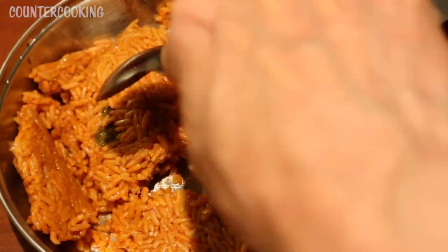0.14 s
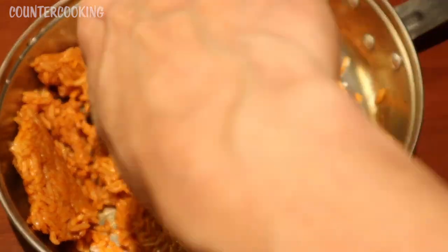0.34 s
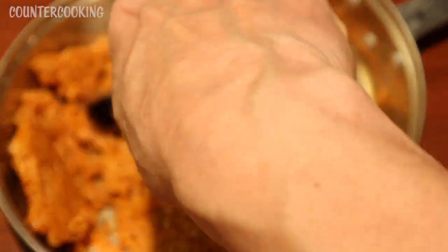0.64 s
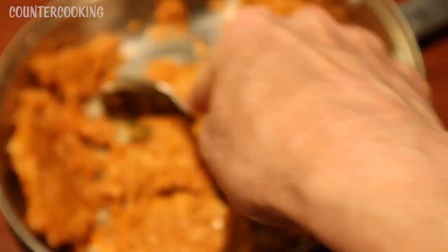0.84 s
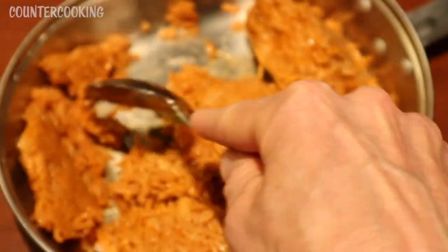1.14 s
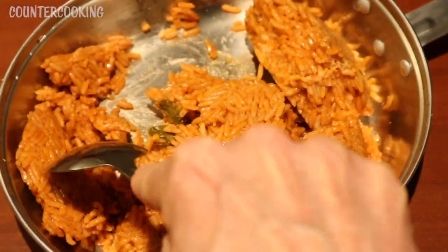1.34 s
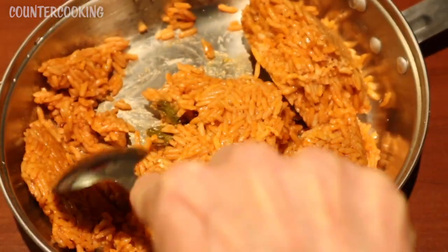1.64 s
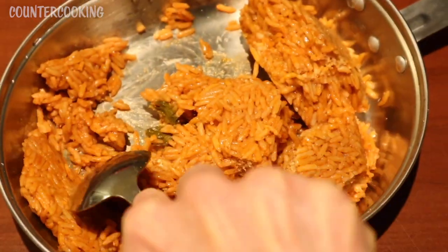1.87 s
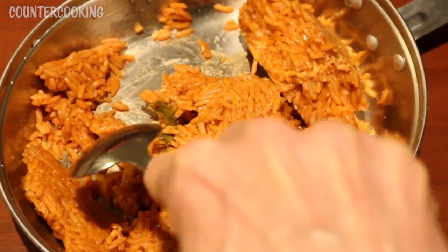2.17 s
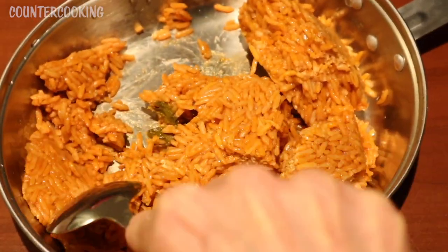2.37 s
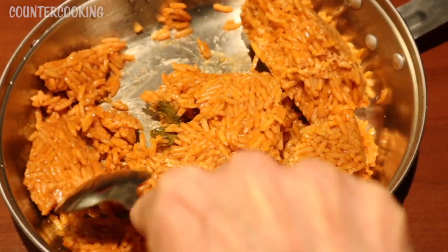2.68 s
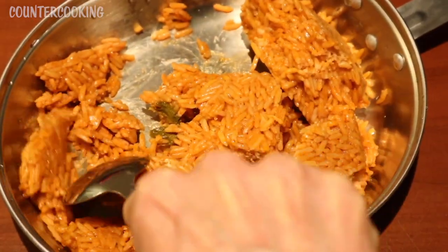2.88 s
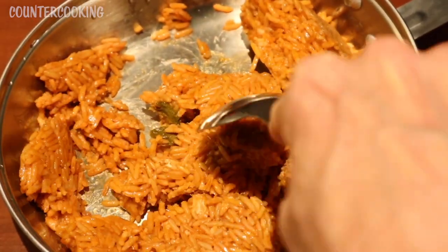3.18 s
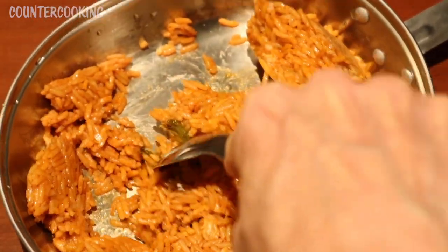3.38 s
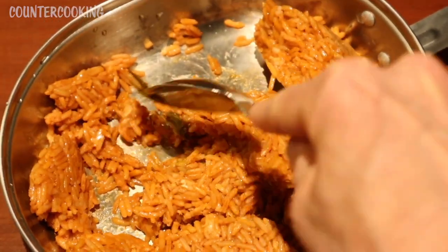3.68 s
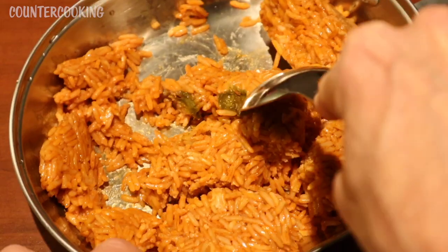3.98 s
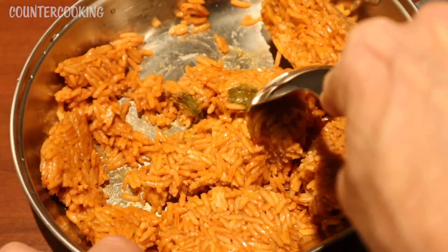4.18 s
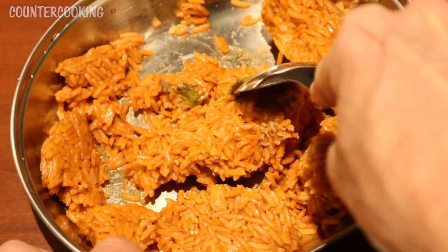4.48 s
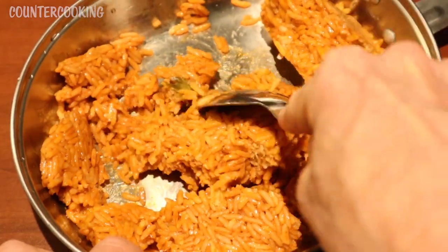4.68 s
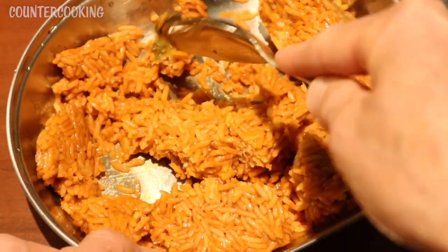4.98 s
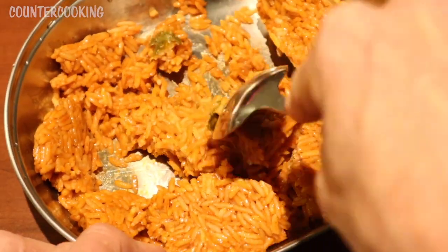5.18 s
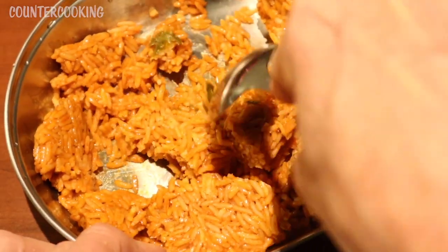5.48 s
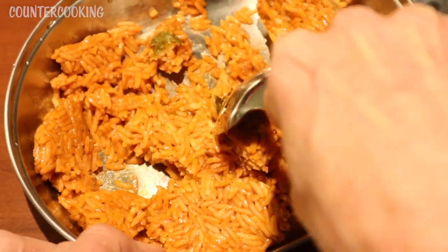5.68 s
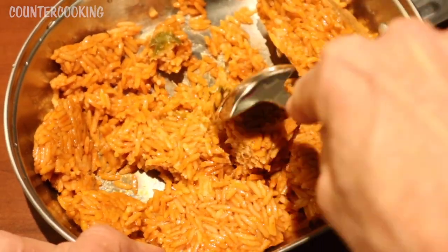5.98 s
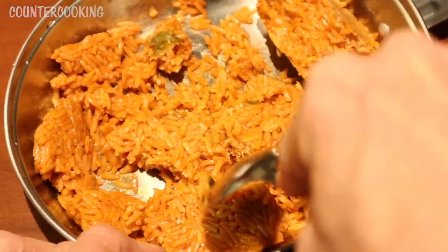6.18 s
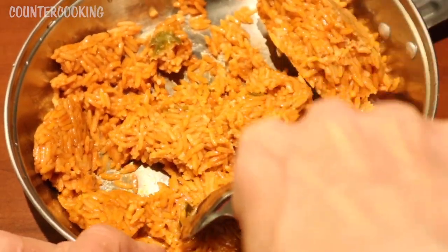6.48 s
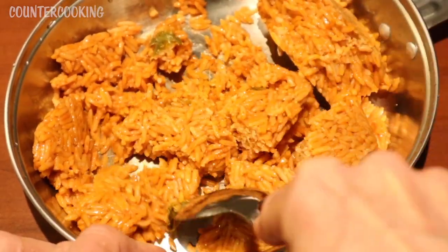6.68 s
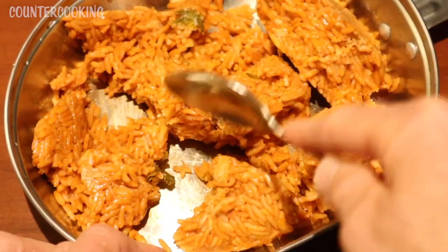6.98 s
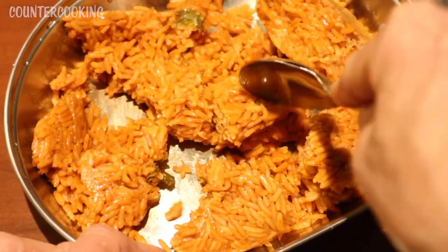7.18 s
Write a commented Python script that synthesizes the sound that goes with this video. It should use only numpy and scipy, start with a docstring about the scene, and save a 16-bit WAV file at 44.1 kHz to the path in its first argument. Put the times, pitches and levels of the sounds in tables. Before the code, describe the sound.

A spoon works through moist rice in a stainless pot on a wooden table, heard close with short room reflections. Irregular hard clacks, mostly deadened by the rice, alternate with gritty scrapes and fine wet crackling. Once the pot tips and its wall rings briefly. Light quick taps come later, then a heavy hollow knock with a dull table bump. A low rumble and wavering hum continue underneath.

```python
"""Breaking up rice in a steel pot

A steel spoon breaks up cooked rice in a stainless pot on a wooden table, in a small humming kitchen.
Knocks are noise bursts and decaying modes of spoon and pot; once the pot tips and its wall rings freely.
Between them, scrapes are random clicks through steel resonances, and the sticky rice crackles and snaps.
Dull table bumps are shaped noise; the room adds a short reverberation, a rumble and a wavering hum."""
import sys
import numpy as np
from scipy import signal
from scipy.fft import rfft, irfft, next_fast_len
from scipy.io import wavfile

SR = 44100
rng = np.random.default_rng(int(sys.argv[2]) if len(sys.argv) > 2 else 0)


def digitize_waveform(pressure):
    """Quantize a signal to 16-bit integers and store it at the path in sys.argv[1].

    Rows of a 2-D input are taken as channels; values are limited to [-1, 1].
    """
    field = np.atleast_2d(pressure).T
    bounded = np.clip(field, -1, 1)
    quanta = np.round(bounded * 32767).astype(np.int16)
    wavfile.write(sys.argv[1], SR, quanta)


N = 323401
TIME = np.arange(N) / SR
RING_TIME = TIME[:SR]  # one second, room for any single sound

# Appliance hum. Each row: frequency in Hz, level in dB rms.
HUM_TONES = [(120, -47.5), (151, -51.5), (240, -61), (360.5, -57.5)]
# Colour of the kitchen air. Each row: frequency in Hz, relative density in dB per Hz.
AIR_COLOUR = [(12, -36.5), (22, -7.5), (45, 1.5), (103, 0), (135, -1.5), (286, -16.5), (367, -15),
              (525, -19.5), (914, -20.5), (994, -23.5), (6010, -40), (7930, -46.5), (10200, -48),
              (11700, -53), (13100, -87), (15000, -83.5)]
# Side against mid for the diffuse air. Each row: frequency in Hz, gain in dB.
AIR_WIDTH = [(30, -25.5), (110, -25), (200, -5), (380, 0.5), (1200, 4), (8000, 6.5)]
# Side against mid for the nearby pot. Each row: frequency in Hz, gain in dB.
POT_WIDTH = [(100, -30.5), (400, -26), (1000, -16.5), (2200, -14.5), (4500, -6.5), (9000, -1.5)]
# Dull bumps of pot and hand on the table. Each row: start in seconds, level in dB rms before the decay.
TABLE_BUMPS = [(.702, -27), (3.459, -27), (6.65, -24.5), (7.243, -29.5)]
# Colour of a bump. Each row: frequency in Hz, relative density in dB per Hz.
BUMP_COLOUR = [(25, -1), (55, -1), (160, -6.5), (300, -18), (1000, -43), (5000, -80)]
# Pushes of the spoon through the rice.
# Each row: start in seconds, length in seconds, relative crackle level at the end in dB.
RICE_PUSHES = [(0.213, 0.54, -50.5), (0.845, 0.17, -51.5), (1.363, 0.11, -53.5), (1.9, .09, -56.5),
               (2.37, .17, -53), (3.78, 0.16, -52), (4.266, 0.63, -46), (4.897, 0.14, -50),
               (5.56, 0.3, -54.5), (6.48, 0.37, -44.5)]
# Wet snaps of rice pulling apart. Each row: start in seconds, relative level in dB.
RICE_SNAPS = [(0.606, -37), (0.804, -34), (1.109, -33.5), (1.439, -33.5), (1.793, -32.5), (4.292, -35),
              (4.655, -27), (5.289, -32), (5.64, -37), (5.976, -30)]
# Colour of crackling rice. Each row: frequency in Hz, gain in dB.
RICE_COLOUR = [(800, -10), (2500, 3.5), (6000, -6), (10000, -3.5), (12000, -8.5), (13500, -14),
               (15500, -38.5)]
# Spoon strokes on the steel. Each row: strongest moment in seconds, length in seconds (twice the sum
# of the rising and falling sigma), relative level in dB, rice under the spoon from 0 to 1.
SPOON_STROKES = [(0.682, 0.052, -50, 0.6), (0.987, 0.089, -55.5, 0.78), (1.375, 0.042, -52, 0.5),
                 (2.132, .024, -49.5, 0.44), (2.567, 0.12, -32.5, 0.52), (2.686, 0.073, -34, 0.2),
                 (3.44, 0.15, -44.5, 0.93), (3.61, 0.094, -56.5, 0.99), (3.833, 0.2, -49.5, 0.78),
                 (4.866, 0.048, -40, 0.33), (5.845, 0.075, -47.5, 0.55), (6.302, .04, -53.5, .4),
                 (6.499, .07, -47, 0.37), (6.808, 0.22, -43, 0.44), (6.899, .11, -34.5, 0),
                 (7.273, 0.072, -57, 0.96)]
# Colour of the broad rasp. Each row: frequency in Hz, gain in dB.
RASP_COLOUR = [(200, -8), (500, 5), (1100, 8), (2200, 19), (4500, -10), (8000, -63.5), (15000, -47.5)]
# Colour of the scrape's hiss. Each row: frequency in Hz, gain in dB.
HISS_COLOUR = [(1500, -19.5), (4000, -12.5), (6200, -2), (7500, -4), (9800, 6), (11500, -2), (13300, -11.5),
               (14500, -33.5), (16000, -39.5)]
# Resonances of spoon and pot in contact. Each row: frequency in Hz, width in Hz, gain in dB.
RUB_RESONANCES = [(1652, 72, 14), (2100, 210, 14.5), (2545, 220, 14), (2856, 190, 17.5), (3350, 80, 4.5),
                  (3980, 140, -26), (4120, 100, -17.5), (5930, 490, -6)]
# Light taps of the spoon. Each row: start in seconds, relative level in dB, spoon pitch in Hz.
LIGHT_TAPS = [(0.1078, -43.5, 2270), (1.1061, -42, 2520), (2.1263, -39.5, 2590), (3.7365, -36, 1490),
              (4.861, -29.5, 2280), (4.928, -27.5, 2000), (4.993, -31, 2010), (5.034, -33, 1310),
              (5.9737, -39, 2280), (6.2774, -42.5, 1780), (6.4864, -36, 2450), (7.02, -45, 2060)]
# The bowl of the spoon, pressed on steel.
# Each row: multiple of its pitch, level in dB, t60 in seconds before any further damping.
SPOON_MODES = [(0.581, -39, .012), (.81, -5, 0.017), (1.001, 5, 0.02), (1.14, -2.5, 0.026),
               (1.62, -11, 0.031)]
# Free wall of the tipped pot.
# Each row: frequency in Hz, level in dB, t60 in seconds before any further damping.
WALL_MODES = [(510.4, 3.5, 0.25), (1164, 0, .25), (1305, 4, 0.41), (1650, -7.5, 0.28), (1717, 8.5, 0.17),
              (1907, -1, 0.28), (2184, -13, 0.6), (2374, -9, 0.29), (2542, -16.5, .16), (3020, -7, 0.31),
              (3276, 3.5, 0.14), (3704, -5.5, 0.2), (4050, -17, .75), (4720, 3, 0.14), (5100, -13, .18),
              (4870, -15, .4), (5200, -13, .14), (6130, -8, 0.22), (9390, 1.5, 0.083)]
# Pot loaded with rice. Each row: frequency in Hz, level in dB, t60 in seconds.
POT_MODES = [(231.5, -16, 0.27), (294.1, -10, 0.24), (350.6, -4, .14), (379, 4, 0.1), (423, -2, 0.16),
             (489.7, -5.5, 0.19), (611.8, -6.5, 0.22), (666, -6.5, 0.16), (761, -6.5, 0.11),
             (824, -12, 0.18), (926.5, -0.5, 0.085), (1200, -6.5, 0.064), (1368, -8, 0.045),
             (1636, -1.5, 0.081), (2080, 7, 0.03), (2200, -11.5, 0.048), (2610, 0, 0.07),
             (3233, 1.5, 0.045)]
# Knocks on the pot. Each row: start in seconds, relative level in dB, brightness in dB per octave,
# hollowness from -1 to 1, spoon pitch in Hz, relative spoon level in dB, floor pitch in Hz.
POT_KNOCKS = [(0.7015, -10.5, -2.5, -0.28, 3450, 8, 962), (2.0101, -16.5, -3.5, -0.77, 2100, 4.5, 426),
              (2.4923, -11, 2.5, -0.081, 2700, -3, 500), (2.5897, -4.5, -3, 0.13, 1890, 5, 406),
              (2.9284, -9.5, 0.58, -0.085, 2140, 3.5, 426), (3.4584, -4.5, -1.4, .2, 2760, 4.5, 616),
              (4.721, -11, -.6, 0.27, 2000, -2, 613), (5.8487, -9.5, -4, -0.11, 2360, 14.5, 1050),
              (6.6496, -3.5, -5, 0.89, 2120, -2, 610)]
# Colour of a knock's contact noise. Each row: frequency in Hz, gain in dB.
CONTACT_COLOUR = [(150, -21), (350, 0.5), (900, 1), (1300, 1.5), (2200, 4.5), (3300, 1.5), (4500, -1),
                  (7500, -7), (10000, -4), (11800, -12), (13500, -21), (16000, -87)]
# Tone of a hollow knock, which booms and ticks more and clacks less.
# Each row: frequency in Hz, gain in dB at hollowness 1.
HOLLOW_TONE = [(380, 1), (750, 9), (2100, -1.5), (4800, -3), (10000, 10)]

AIR_DB = -40  # rms
TIP_S, TIP_DB = 2.4922, -21
DAMPING_AFTER_S = 0.12  # the low wall modes begin to be damped this long after the pot tips
SWELL_SHARE = 0.62  # part of a stroke spent pressing harder; the rest lets go
# what a stroke adds to its rasp: dB on bare steel, dB on a bed of rice
STROKE_HISS_DB, STROKE_FLOOR_DB = (-19, 1.5), (-15.5, 9.5)
# the crackle grows as the clump is squeezed and dies when it gives way
PUSH_ATTACK_S, PUSH_BUILD_DB_PER_S, PUSH_RELEASE_DB_PER_S = .03, 22, 110
TOP_HZ = 15800  # upper limit of the finished sound


def undb(db):
    """Decibels to gain."""
    return 10 ** (np.asarray(db) / 20)


def unit(x):
    """Scale to rms 1."""
    return x / np.sqrt(np.mean(x ** 2))


def colour(x, points):
    """Causal minimum-phase filter through (Hz, dB) points."""
    size = 2 * next_fast_len(x.shape[-1] // 2 + 1024)
    point_hz, point_db = np.transpose(points)
    bin_hz = np.arange(size // 2 + 1) * SR / size
    gain_db = np.interp(np.log(bin_hz + 1), np.log(point_hz), point_db)
    # folding the cepstrum forward in time keeps the filter from sounding before its input
    cepstrum = irfft(np.log(undb(gain_db)))[:size // 2]
    cepstrum[1:] *= 2
    response = np.exp(rfft(cepstrum, size))
    return irfft(rfft(x, size) * response)[..., :x.shape[-1]]


def stereo(mid, side, width=POT_WIDTH):
    """Left and right: alike in the bass, apart in the treble."""
    return mid + np.array([[1], [-1]]) * colour(side, width)


def noise(size):
    """Diffuse noise at the two microphones."""
    return stereo(*rng.standard_normal((2, size)))


def fade(t60):
    """Exponential decay, 60 dB down after t60 seconds."""
    return np.exp(-np.log(1000) * RING_TIME / t60)


def wander(rate):
    """A random course at rms 1, with rate new targets a second."""
    knots = rng.standard_normal(N // 50)
    return unit(np.interp(TIME * rate, np.arange(len(knots)), knots))


def add(track, s, sound):
    """Mix a sound into a track at time s."""
    start = int(s * SR)
    track[:, start:start + sound.shape[-1]] += sound[..., :N - start]


def grains(rate, spread_db):
    """Tiny clicks at random times, most weak and a few strong, at rms 1."""
    happens = rng.random(N) < rate / SR
    strength = undb(spread_db * np.minimum(rng.exponential(size=N), 4))
    clicks = happens * strength * rng.standard_normal((2, N))
    return unit(stereo(*clicks))


def resonate(x, resonances):
    """Sum of (Hz, width Hz, dB) resonances driven by x, at rms 1."""
    total = 0
    for hz, width, db in resonances:
        b, a = signal.iirpeak(hz, hz / width, fs=SR)
        total = total + undb(db) * signal.lfilter(b, a, x)
    return unit(total)


def ring(modes, detune, scatter_db):
    """Struck modes as decaying sines; each mode's pitch and strength vary a little at random."""
    mid, side = np.zeros((2, SR))
    for k, (hz, db, t60) in enumerate(modes):
        shift, strength, lean = rng.standard_normal(3)
        t = RING_TIME[RING_TIME < 2 * t60]
        level = (-1) ** k * undb(db + scatter_db * strength)  # neighbouring modes start in opposite phase
        decay = np.exp(-np.log(1000) * t / t60)
        wave = level * decay * np.sin(2 * np.pi * hz * (1 + detune * shift) * t)
        mid[:len(t)] += wave
        side[:len(t)] += np.tanh(lean) * wave
    return stereo(mid, side)


def background(waver=.2):
    """Low rumble of the room, as coloured noise, and a hum of sines wavering in level and phase."""
    air = stereo(*rng.standard_normal((2, N)), AIR_WIDTH)
    out = undb(AIR_DB) * unit(colour(air, AIR_COLOUR))
    for hz, db in HUM_TONES:
        level = undb(db) * np.sqrt(2) * (1 + waver * wander(6.7))
        phase = 2 * np.pi * hz * TIME + waver * wander(13.0)
        out = out + level * np.sin(phase)
    return out


def kitchen(x, wet_db=-7, low_t60=0.3, high_t60=0.074, treble=0.37, gap_s=0.0026):
    """Table and near walls answer within milliseconds, as decaying noise; the treble dies first."""
    diffuse = noise(SR)
    low = signal.sosfilt(signal.butter(1, 3000, fs=SR, output="sos"), diffuse)
    high = diffuse - low
    opening = np.clip(RING_TIME / gap_s - 1, 0, 1)  # silent for one gap, full after two
    tail = (low * fade(low_t60) + treble * high * fade(high_t60)) * opening
    tail /= np.sqrt(np.sum(fade(low_t60) ** 2))
    return x + undb(wet_db) * signal.fftconvolve(x, tail, axes=1)[:, :N]


def bumps(t60=0.28):
    """The table takes up the push as a dull thump of fading low noise."""
    out = np.zeros((2, N))
    for s, db in TABLE_BUMPS:
        thump = unit(colour(noise(SR), BUMP_COLOUR)) * fade(t60)
        add(out, s, undb(db) * thump)
    return out


def rice_crackle(crackle_db=-4, clumping_db=2.0):
    """Moist grains part with a fine, uneven crackle that builds during each push."""
    squeeze = np.zeros(N)
    for start, length, db in RICE_PUSHES:
        to_end = start + length - TIME
        slope = np.where(to_end > 0, PUSH_BUILD_DB_PER_S, PUSH_RELEASE_DB_PER_S)
        attack = np.clip((TIME - start) / PUSH_ATTACK_S, 0, 1)
        push = undb(db - slope * np.abs(to_end)) * attack
        squeeze = np.maximum(squeeze, push)
    crackle = grains(rate=4000, spread_db=2) * undb(clumping_db * wander(70))
    return unit(colour(crackle, RICE_COLOUR)) * undb(crackle_db) * squeeze


def rice_snaps(snap_db=-7, snap_t60=0.025):
    """Sticky grains snap apart in short bursts of noise."""
    out = np.zeros((2, N))
    for s, db in RICE_SNAPS:
        snap = colour(noise(SR) * fade(snap_t60), RICE_COLOUR)
        add(out, s, undb(db + snap_db) * snap)
    return out


def scrapes(broad_db=-6, wall_db=-8, wall_width_hz=30, floor_width_hz=70):
    """The spoon's edge slips in dense tiny jerks, which rasp in the steel's resonances and hiss above."""
    pressure, sharpness, weight = np.zeros((3, N))
    for top, length, db, bed in SPOON_STROKES:
        rise, fall = SWELL_SHARE * length / 2, (1 - SWELL_SHARE) * length / 2
        sigma = np.where(TIME < top, rise, fall)
        stroke = undb(db) * np.exp(-.5 * ((TIME - top) / sigma) ** 2)
        pressure += stroke
        sharpness += stroke * undb(np.interp(bed, (0, 1), STROKE_HISS_DB))
        weight += stroke * undb(np.interp(bed, (0, 1), STROKE_FLOOR_DB))
    catching = undb(2.2 * wander(450))
    slips = grains(rate=9000, spread_db=1.5) * catching
    # the upper modes of the wall sing faintly along
    upper_wall = [(hz, wall_width_hz, 0) for hz, _, _ in WALL_MODES if hz > 2000]
    singing = resonate(slips, upper_wall)
    broad = unit(colour(slips, RASP_COLOUR))
    rasp = resonate(slips, RUB_RESONANCES) + undb(wall_db) * singing + undb(broad_db) * broad
    # dragging a clump of rice makes the floor grumble, with the contrast between its modes halved in dB
    floor = [(hz, floor_width_hz, db / 2) for hz, db, _ in POT_MODES if 350 < hz < 1500]
    grumble = resonate(slips, floor)
    hiss = unit(colour(noise(N) * catching, HISS_COLOUR))
    return rasp * pressure + hiss * sharpness + grumble * weight


def spoon(hz):
    """A short clack of the spoon's bowl, its modes set at multiples of the given pitch."""
    modes = [(hz * multiple, db, t60) for multiple, db, t60 in SPOON_MODES]
    return ring(modes, detune=0.0062, scatter_db=3.5)


def taps(tap_db=-3, grit_db=-6, grit_t60=0.074):
    """The spoon touches steel lightly through a film of starch, a soft-edged clack with some grit."""
    out = np.zeros((2, N))
    onset = 1 - np.exp(-RING_TIME / .001)  # time constant 1 ms
    for s, db, hz in LIGHT_TAPS:
        grit = undb(grit_db) * colour(noise(SR) * fade(grit_t60), RASP_COLOUR)
        add(out, s, undb(db + tap_db) * (spoon(hz) + grit) * onset)
    return out


def tipped_pot(overtones_db=-17, overtone_t60=.22, slope_db=-4, table_damping_db_per_s=110):
    """Off the table, the wall rings with a shimmer of overtones; the table then damps its low modes."""
    pitches = np.geomspace(1300, 11000, 44)
    overtones = [(hz, overtones_db + slope_db * np.log2(hz / 2000), overtone_t60) for hz in pitches]
    low = ring([mode for mode in WALL_MODES if mode[0] < 2000], detune=.0002, scatter_db=.3)
    high = ring([mode for mode in WALL_MODES if mode[0] >= 2000], detune=.0002, scatter_db=.3)
    shimmer = ring(overtones, detune=.012, scatter_db=3)
    damping = undb(-table_damping_db_per_s * np.maximum(RING_TIME - DAMPING_AFTER_S, 0))
    out = np.zeros((2, N))
    add(out, TIP_S, undb(TIP_DB) * (low * damping + high + shimmer))
    return out


def burst(t60):
    """A short crack of fading noise, about equally strong at all frequencies."""
    spectrum = rfft(rng.standard_normal((2, SR)) * fade(t60))
    flat = spectrum / np.abs(spectrum)  # keep only the phases
    crack = irfft(flat, SR) * fade(10 * t60)
    return stereo(*crack) * np.sqrt(np.sum(fade(t60) ** 2))


def knocks(crack_db=3, crack_t60=0.019, rattle_db=-5, hollow_rattle_db=-4, rattle_t60=0.079,
           modes_db=-12, spoon_db=-5, floor_db=-2):
    """A crack at the contact, the spoon's clack, a quickly damped noisy rattle and the pot's low modes."""
    out = np.zeros((2, N))
    band_hz, hollow_db = np.transpose(HOLLOW_TONE)
    for s, db, brightness, hollowness, hz, clack_db, floor_hz in POT_KNOCKS:
        crack = undb(crack_db) * burst(crack_t60)
        # the noise stands for dense overtones
        rattle = undb(rattle_db + hollow_rattle_db * hollowness) * noise(SR) * fade(rattle_t60)
        contact = 2 * colour(crack + rattle, CONTACT_COLOUR)  # both doubled against body and clack
        # the spot struck adds a short floor mode at its own pitch
        modes = POT_MODES + [(floor_hz, floor_db, .07)]
        body = undb(modes_db) * ring(modes, detune=.004, scatter_db=.8)
        # pressed hard on the steel, the spoon is silenced almost at once
        clack = undb(spoon_db + clack_db) * spoon(hz) * fade(.025)
        # each knock has its own tilt from dull to bright, plus its share of hollow tone
        tilt_db = brightness * np.log2(band_hz / band_hz[0])
        tone_db = db + tilt_db + hollowness * hollow_db
        add(out, s, colour(contact + body + clack, list(zip(band_hz, tone_db))))
    return out


def scene():
    """Spoon and rice reverberate in the kitchen; the tipped pot, bumps and background stay dry."""
    in_room = rice_crackle() + rice_snaps() + scrapes() + taps() + knocks()
    return background() + bumps() + kitchen(in_room) + tipped_pot()


def record(dry):
    """Microphones lose the highest treble, the hardest knocks overload the recorder, the top is cut."""
    picked_up = signal.sosfilt(signal.butter(8, 13200, fs=SR, output="sos"), dry)
    overloaded = np.tanh(picked_up)
    return signal.sosfilt(signal.ellip(8, .2, 80, TOP_HZ, fs=SR, output="sos"), overloaded)


dry = scene()
out = record(dry)
digitize_waveform(out)
```